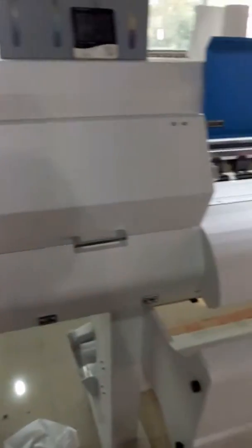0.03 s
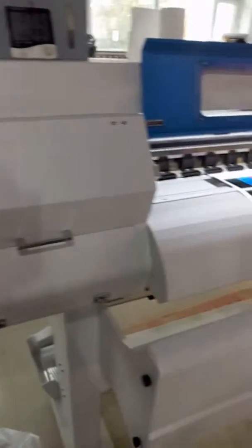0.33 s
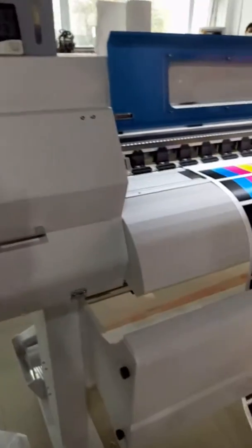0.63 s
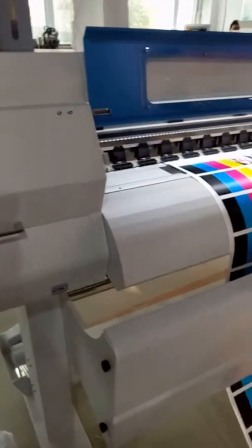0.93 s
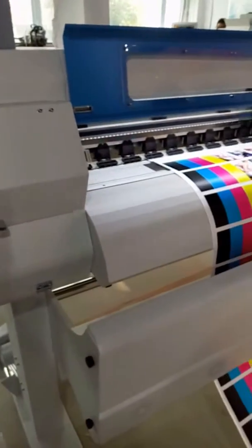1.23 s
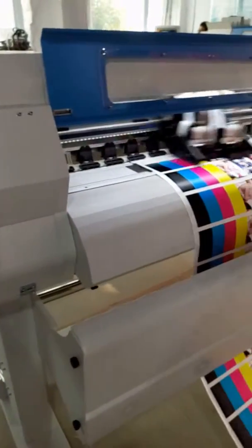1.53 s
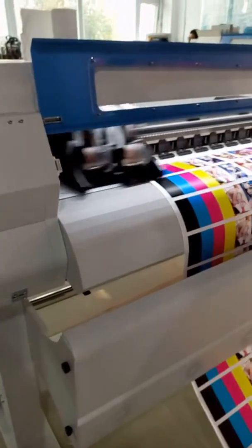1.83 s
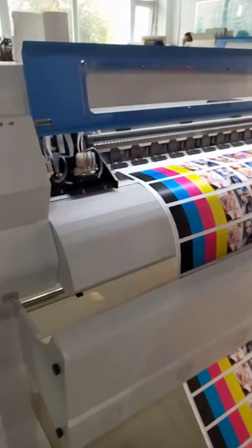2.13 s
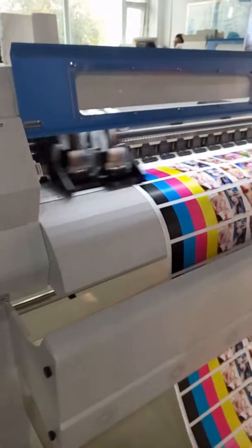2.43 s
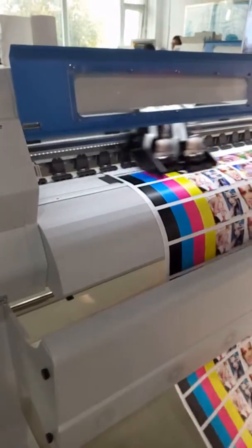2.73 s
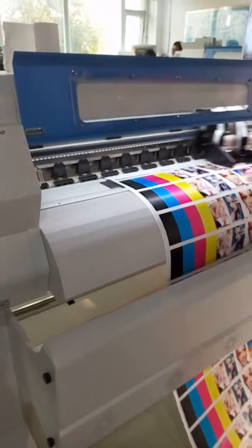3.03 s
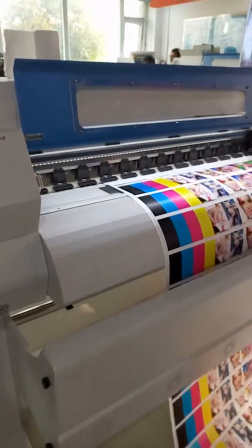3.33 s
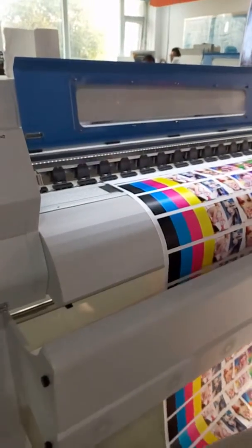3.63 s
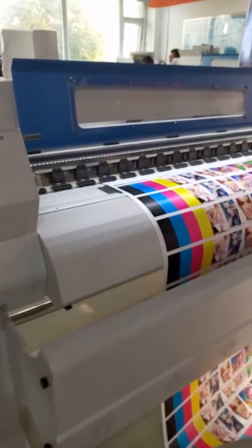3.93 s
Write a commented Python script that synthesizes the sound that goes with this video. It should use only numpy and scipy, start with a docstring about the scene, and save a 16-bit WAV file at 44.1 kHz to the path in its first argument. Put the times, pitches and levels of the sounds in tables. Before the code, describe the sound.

Over humming, rushing fans, a wide-format printer's carriage slides with a hiss and whine, pauses briefly and returns. Faint ticks grow into a few sharp, ringing clacks, heard from about a metre away in a quiet workshop.

```python
"""The carriage of a wide-format inkjet printer hisses and whines along its rail, brakes, turns, runs back.
Its cable chain ticks and clacks, and the metal housing rings with each clack.
The feed motor hums as it advances the sheet; suction fans hum and rush underneath throughout.
Heard from a metre away in a quiet workshop."""
import sys
import numpy as np
from scipy import signal
from scipy.fft import rfft, irfft, next_fast_len
from scipy.io import wavfile
from scipy.ndimage import uniform_filter1d, map_coordinates

SR = 44100
rng = np.random.default_rng(int(sys.argv[2]) if len(sys.argv) > 2 else 0)


def store_wav(level_fs):
    """Save 16-bit WAV to argv[1]."""
    pcm = np.round(np.clip(np.atleast_2d(level_fs), -1, 1) * 32767)
    wavfile.write(sys.argv[1], SR, pcm.T.astype(np.int16))


N = 176400
TIME = np.arange(N) / SR

# carriage passes: start/s, stop/s, top speed/share of full, hiss trim/dB
PASSES = [(-.6, .15, .55, 0), (.39, 2.13, 1, -0.13), (2.39, 4.6, .952, -0.6)]
ACCEL_PER_S, BRAKE_PER_S = 4.3, 4.2  # change of the speed share


def carriage():
    """The carriage speeds up, cruises and brakes; hiss, whine and ticks ride on its speed."""
    runs = [np.clip(np.minimum((TIME - start) * ACCEL_PER_S, (stop - TIME) * BRAKE_PER_S), 0, top)
            for start, stop, top, _ in PASSES]
    speed = sum(runs)
    rubbing = sum(run * amp(trim_db) for run, (*_, trim_db) in zip(runs, PASSES))
    return rail_hiss(rubbing) + drive_whine(speed) + chain_ticks(speed)


# colour of the rail hiss at full speed: f/Hz, left density/dB, right density/dB
RAIL_COLOUR = [(120, -87, -83), (400, -71.5, -73), (768, -73.5, -73.5), (1290, -75, -75.5),
               (1880, -78, -79.5), (2400, -77.5, -82), (3380, -79.5, -78), (4750, -74, -74.5),
               (5550, -81.5, -71.5), (6300, -76, -68), (7180, -83, -75), (8470, -87, -84.5),
               (10600, -81.5, -91.5), (12400, -77.5, -91.5), (14000, -80, -94), (15200, -90, -97)]


def rail_hiss(rubbing, lag_s=0.055, turn_s=2.2, fade_db_per_s=0.7):
    """Bearings hiss on the rail, louder towards the turn; the hiss lingers briefly in the room."""
    keep = np.exp(-1 / (SR * lag_s))
    lingering = signal.lfilter([1 - keep], [1, -keep], rubbing, zi=[rubbing[0]])[0]
    swell = amp(fade_db_per_s * (0.5 - np.abs(TIME - turn_s)))
    hiss = housing_resonances(coloured(patchy_noise(depth_db=1.5), RAIL_COLOUR))
    return hiss * lingering * swell * amp(0.66 * wobble(14))


# drive partials at full speed: f/Hz, level/dB
WHINE_PARTIALS = [(1251, -50.5), (1960, -56.5), (2498, -63.5), (2672, -61), (3560, -63.5), (4432, -66),
                  (4805, -62)]


def drive_whine(speed):
    """The drive's pitch and level follow the speed; each partial shimmers separately in each ear."""
    travel = np.cumsum(speed * (1 + 0.0019 * wobble(9))) / SR
    whine = np.zeros((2, N))
    for hz, db in WHINE_PARTIALS:
        shimmer = np.array([wobble(24.86) + 1j * wobble(24.83) for ear in range(2)])
        whine += amp(db) * np.real(shimmer * np.exp(2j * np.pi * hz * travel))
    return whine * speed


# colour of a chain tick or clack: f/Hz, left density/dB, right density/dB
CLACK_COLOUR = [(200, -72, -75), (1000, -64, -65), (1620, -55, -53), (2170, -40.5, -55), (2605, -45.5, -58),
                (3350, -72, -47), (4300, -40.5, -60), (4800, -65, -58.5), (6670, -49, -38),
                (7780, -57, -59.5), (8340, -59.5, -83), (10400, -71, -52), (11900, -50.5, -70),
                (15400, -55, -73)]


def chain_ticks(speed, full_speed_per_s=18, gain_db=-33, spread_db=0.5, t60_s=0.031):
    """Links tick faintly at random, more often the faster the carriage runs."""
    struck = rng.random(N) < full_speed_per_s * speed / SR
    blows = struck * amp(gain_db + spread_db * rng.standard_normal(N))
    decay = amp(-60 * np.arange(SR // 10) / SR / t60_s)
    envelope = signal.fftconvolve(blows, decay)[:N]
    return coloured(rng.standard_normal((2, N)) * envelope, CLACK_COLOUR)


# clack cues: t/s, slap gain/dB, ring gain/dB, treble tilt/(dB/octave), rise/s, ping f/Hz, ping level/dB
CLACK_CUES = [(.447, -20.5, -16, 2.5, 0.0028, 6300, -32), (0.654, -23, -16, 1, .002, 6300, -45),
              (2.276, -26, -27, -2, 0.0022, 6300, -50), (2.466, -20, -15, 1, .003, 6300, -35),
              (2.51, -23, -17, -7, .003, 1220, -38), (2.543, -24, -14, -3, .002, 4440, -42),
              (2.569, -15.5, -9, 1, 0.00073, 6150, -44), (3.116, -1.5, -2, 0.5, 0.0013, 5650, -10),
              (3.1584, -10.5, -4.5, -2.5, .002, 1450, -20.5), (3.465, -12.5, -11, -2.5, 0.0026, 6280, -41),
              (3.698, -25, -13, -0.5, 0.0022, 4470, -45), (3.906, -2.5, 1.5, 0.7, 0.00037, 2620, -13)]
HOLD_S, SLAP_T60_S, PING_T60_S, RING_RISE_S = 0.0016, 0.011, 0.015, 0.0015


def chain_clacks(low_cut_hz=250):
    """A link slaps down with a noise burst and a ping of its own, and the housing rings on."""
    out, n = np.zeros((2, N + SR)), SR // 2
    t = np.arange(n) / SR
    for start, slap_db, ring_db, tilt_db, rise_s, ping_hz, ping_db in CLACK_CUES:
        attack = 1 - np.exp(-t / rise_s)
        ring_attack = 1 - np.exp(-t / (RING_RISE_S + rise_s))
        decaying_s = np.maximum(t - HOLD_S - rise_s, 0)
        burst = coloured(rng.standard_normal((2, n)), CLACK_COLOUR, tilt_db)
        slap = burst * amp(slap_db - 60 * decaying_s / SLAP_T60_S)
        ping = link_ping(t, ping_hz) * amp(ping_db - 60 * decaying_s / PING_T60_S)
        ring = housing_ring(n, tilt_db) * amp(ring_db)
        out[:, round(start * SR):][:, :n] += (slap + ping) * attack + ring * ring_attack
    # low cut keeps the clacks free of rumble
    return filtered(out[:, :N], lambda hz: hz ** 2 / (hz ** 2 + low_cut_hz ** 2))


def link_ping(t, hz, width_hz=470):
    """A link's own note, roughened by a wandering phase, panned by the left/right balance at its pitch."""
    scatter = np.cumsum(rng.standard_normal((2, len(t))), axis=1) * np.sqrt(2 * np.pi * width_hz / SR)
    phase = 2 * np.pi * hz * t + uniform_filter1d(scatter, size=16, axis=1)
    pan_db = (along(CLACK_COLOUR, hz, column=1) - along(CLACK_COLOUR, hz, column=2)) / 2
    return amp([[pan_db], [-pan_db]]) * np.sin(phase)


# colour of the housing's ring: f/Hz, left density/dB, right density/dB
RING_COLOUR = [(200, -69, -76), (497, -65.5, -65.5), (1130, -56, -57), (1610, -67.5, -60),
               (2230, -55, -65.5), (3200, -62, -59), (4470, -56.5, -57), (6560, -71, -49), (7400, -57, -63),
               (8250, -72, -69), (12200, -61.5, -88), (15000, -70, -83)]
# length of its tail: f/Hz, T60/s
RING_DECAY = [(500, 0.25), (2000, 0.39), (6000, 0.21), (13000, 0.17)]


def housing_ring(n, tilt_db):
    """The struck metal housing rings as a noisy tail, each band dying at its own rate."""
    noise = coloured(rng.standard_normal((2, n)), RING_COLOUR, tilt_db)
    hz, when, bands = signal.stft(noise, SR, nperseg=256)
    decay = amp(-60 * when / along(RING_DECAY, hz)[:, None])
    return signal.istft(bands * decay, SR, nperseg=256)[1][:, :n]


# sheet advances: start/s, length/s, f/Hz, level/dB
FEED_CUES = [(0, .53, 123.3, -41.5), (.57, 0.2, 121.5, -46)]


def feed_motor(ramp_s=0.067):
    """The feed motor hums, wavering in level, while it advances the sheet."""
    hum = np.zeros(N)
    for start, length, hz, db in FEED_CUES:
        fade = np.clip(np.minimum(TIME - start, start + length - TIME) / ramp_s, 0, 1)
        hum += amp(db) * fade * np.sin(2 * np.pi * hz * TIME)
    return np.sqrt(2) * hum * amp(1.2 * wobble(16))


# fader ride of the main fan hum: t/s, level/dB
HUM_RIDE = [(0, -27.5), (.15, -27.5), (.4, -30.5), (.62, -28.5), (.7, -34.5), (.8, -25.5), (.89, -32.5),
            (1.02, -28), (1.35, -29), (1.7, -30.5), (2.02, -29), (2.25, -27), (2.6, -30), (3.05, -31.5),
            (3.4, -30.5), (3.8, -32), (4, -30.5)]


def fan_hum(blade_hz=147.8):
    """The loudest fan's blade tone swells and sinks with a slight flutter."""
    tone = np.real(flutter(0.09) * np.exp(2j * np.pi * blade_hz * TIME))
    return np.sqrt(2) * ride(HUM_RIDE) * tone


# fan and motor tones: f/Hz, left level/dB, right level/dB, flutter depth/0-1,
# level change as the listener walks along/(dB/s)
FAN_TONES = [(49.1, -54.5, -52, .03, 0), (98, -57, -56.5, 0.05, 1.5), (199.5, -42, -48.5, 0.9, -0.5),
             (294, -39.5, -40, 0.4, 1), (329.3, -42.5, -48, 0.97, 1), (391.8, -41.5, -48.5, 0.36, 2.5),
             (450, -48, -61, 0.76, -2.5), (533.8, -48.5, -45, 0.45, 0), (1021, -52.5, -50.5, 0.54, 0),
             (1049, -53, -55, 0.26, 1.5), (1078.5, -49.5, -49.5, 0, 1), (1107, -54, -66, 0.1, 1),
             (2556, -57, -57, .9, -2.5), (2340, -55, -56.5, .9, 3), (6450, -64, -68, 1, -4)]


def fan_tones(speed_drift=0.0012):
    """Blade and shaft tones drift together with the fan speed, each with its own flutter."""
    turning = TIME + speed_drift * np.cumsum(wobble(3.04)) / SR
    out = np.zeros((2, N))
    for hz, left_db, right_db, depth, walk_db in FAN_TONES:
        walk = amp(walk_db * (TIME - TIME.mean()))
        unsteady = flutter(depth) / np.sqrt(1 + 2 * depth ** 2)
        tone = walk * unsteady * np.exp(2j * np.pi * (hz * turning + rng.random()))
        out += np.real([amp(left_db) * tone, amp(right_db) * tone * np.exp(1j * stereo_angle(hz))])
    return np.sqrt(2) * out


# colour of the air bed: f/Hz, left density/dB, right density/dB
AIR_COLOUR = [(22, -77, -85), (38, -84, -84), (70, -84, -84), (124, -65.5, -61.5), (180, -68, -62),
              (255, -59, -61), (315, -64.5, -63), (523, -62.5, -68.5), (646, -69, -66),
              (1100, -71.5, -70.5), (1400, -72, -75.5), (1690, -76.5, -76.5), (2470, -73, -75),
              (3550, -79, -79.5), (5000, -85, -77.5), (6340, -83, -72), (8030, -92.5, -91.5),
              (10400, -90.5, -102), (12700, -85.5, -109), (15000, -93, -111)]


def fan_air():
    """Air rushes through the suction fans, coloured by the housing."""
    return housing_resonances(coloured(patchy_noise(depth_db=1.17), AIR_COLOUR))


# fader ride of the drone: t/s, gain/dB
DRONE_RIDE = [(0, -4), (.4, -3.5), (.85, 2.5), (1.25, -1.5), (1.48, -21), (1.95, 0.5), (2.45, -14),
              (2.8, -2.5), (3.35, 0.5), (3.7, -3.5), (4, -6)]
# colour of the drone: f/Hz, left density/dB, right density/dB
DRONE_COLOUR = [(149, -86, -87), (288, -63.5, -60.5), (320, -58.5, -61), (431, -62.5, -65),
                (594, -75.5, -72.5), (1100, -100, -100)]


def housing_drone():
    """The housing drones in a low band of noise that swells and dips."""
    return ride(DRONE_RIDE) * coloured(rng.standard_normal((2, N)), DRONE_COLOUR)


def housing_resonances(x, depth_db=1.73, spacing_hz=44.74):
    """The housing lifts some narrow bands and sinks others, differently for each ear."""
    knots = rng.standard_normal((2, 4096))

    def response(hz):
        ripple = np.array([map_coordinates(ear, [hz / spacing_hz], mode="wrap") for ear in knots])
        return amp(depth_db * np.minimum(hz / 1500, 1) * ripple)  # shallower in the bass
    return filtered(x, response)


# stereo image: f/Hz, left-right correlation/0-1
CORRELATION = [(50, .99), (120, 0.85), (240, 1), (480, 0.67), (950, 0.11), (1900, 0)]


def stereo_angle(hz):
    """Angle between the ears' signals: 0 is mono, pi/2 is fully wide."""
    return np.arccos(np.clip(along(CORRELATION, hz), -1, 1))


def coloured(white, colour, tilt_db=0):
    """Two white noises as mid and side, then EQ for each ear, tilted per octave about 4 kHz."""
    def width(hz):
        half = stereo_angle(hz) / 2
        return np.array([np.cos(half), np.sin(half)])

    def eq(hz):
        tilt = tilt_db * np.log2(np.maximum(hz, 800) / 4000)
        return amp([along(colour, hz, column) + tilt for column in (1, 2)])
    mid, side = filtered(white, width)
    return filtered(np.array([mid + side, mid - side]), eq) * np.sqrt(SR / 2)


def patchy_noise(depth_db):
    """Two white noises with patches of random gain across time and frequency."""
    bands = signal.stft(rng.standard_normal((2, N)), nperseg=512)[2]
    patches = uniform_filter1d(rng.standard_normal(bands.shape[1:]), size=6, axis=0)
    patches = uniform_filter1d(patches, size=12, axis=1)
    return signal.istft(bands * amp(depth_db * patches / patches.std()), nperseg=512)[1][:, :N]


def flutter(depth, rate=17):
    """A complex gain that shakes a tone's level and phase."""
    return 1 + depth * (wobble(rate) + 1j * wobble(rate))


def wobble(rate):
    """A smooth random curve, rate knots a second."""
    coarse = np.linspace(0, N, 2048)
    curve = map_coordinates(rng.standard_normal(1024), [coarse * rate / SR + 2], mode="wrap")
    return np.interp(np.arange(N), coarse, curve)


def filtered(x, response):
    """EQ x with a gain that is a function of frequency."""
    n = x.shape[-1]
    padded = next_fast_len(n + SR // 10)
    return irfft(rfft(x, padded) * response(np.fft.rfftfreq(padded, 1 / SR)), padded)[..., :n]


def along(table, hz, column=1):
    """One column of a table, read on a log frequency axis."""
    points = np.array(table, float)
    return np.interp(np.log(hz + 1), np.log(points[:, 0] + 1), points[:, column])


def ride(points):
    """Fader points (t/s, gain/dB) as a gain curve."""
    return amp(np.interp(TIME, *np.transpose(points)))


def amp(db):
    """Decibels to gain."""
    return 10 ** (np.asarray(db) / 20)


def scene():
    """Carriage and chain over a bed of fans, drone and feed motor."""
    bed = fan_air() + fan_tones() + fan_hum() + housing_drone() + feed_motor()
    return carriage() + chain_clacks() + bed


def record(dry, ceiling=0.85, top_hz=15500):
    """Soft-clip the highest peaks and cut everything above the band limit."""
    rounded = dry / (1 + np.abs(dry / ceiling) ** 6) ** (1 / 6)
    return filtered(rounded, lambda hz: hz < top_hz)


dry = scene()
out = record(dry)
store_wav(out)
```